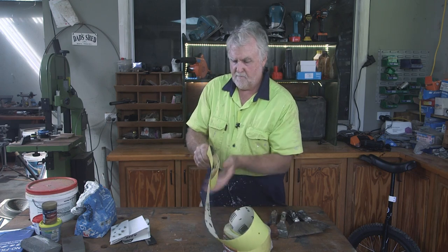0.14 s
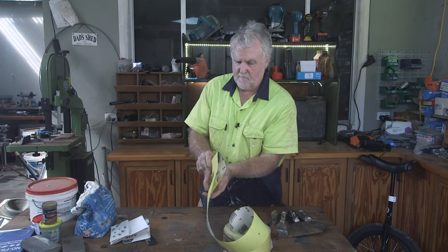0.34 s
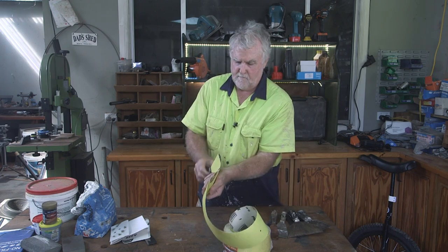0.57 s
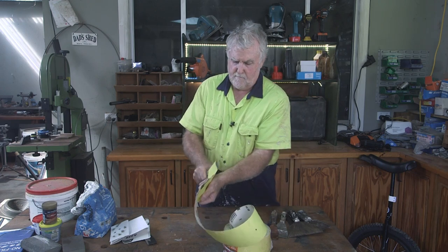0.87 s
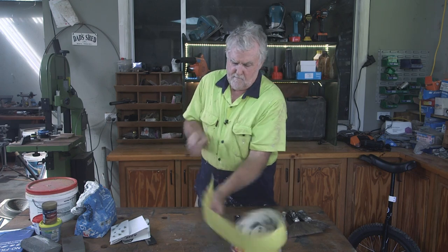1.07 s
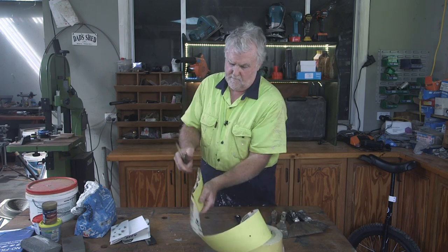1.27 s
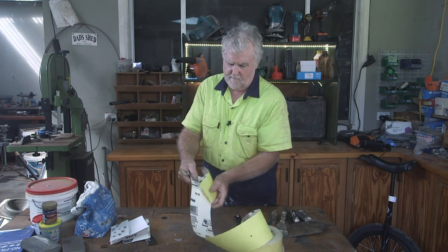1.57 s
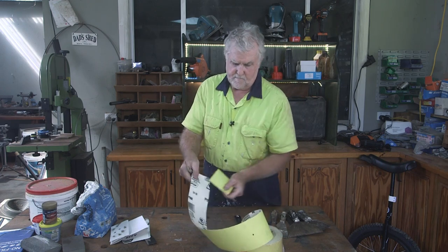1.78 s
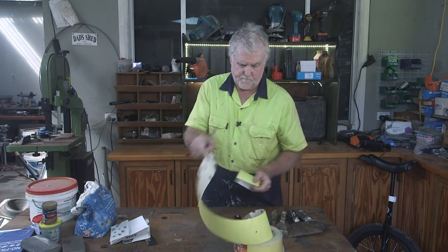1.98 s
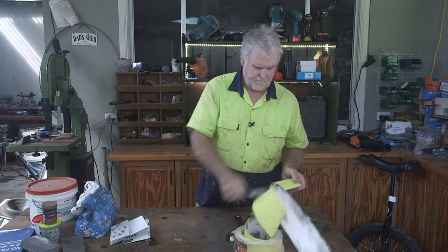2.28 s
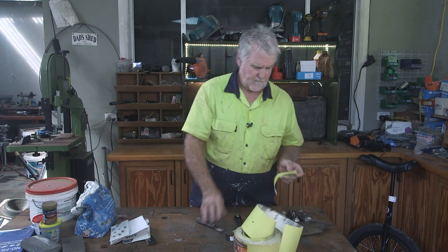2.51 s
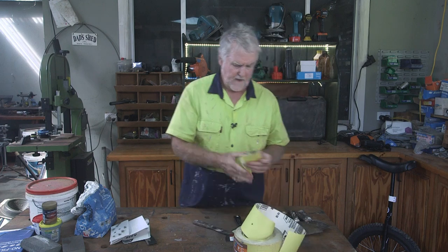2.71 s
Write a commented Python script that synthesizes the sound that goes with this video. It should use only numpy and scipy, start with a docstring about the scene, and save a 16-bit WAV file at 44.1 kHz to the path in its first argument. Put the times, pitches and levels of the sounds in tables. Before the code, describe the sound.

Sandpaper is handled close by in a small, quiet workshop: soft gritty rubs and light crackles for the first second, with a small hollow flop near 0.8. At about 1.0 a blade rips it in one short, sharp stroke, then crisp crackles and flops to 1.3. Quieter rustling follows, growing crinkly around 2.4. At 2.54-2.75 a putty knife clatters and rings on the wooden bench, with last paper scrapes.

```python
"""A small workshop with a wooden bench, heard from close by while sandpaper is handled.
Random grains make the gritty sheet rub and ring, and short bursts of snapping fibres make it crackle.
Bent hollow notes are its flops. A putty knife rips through the fold in one quick stroke of dense grains.
Dropped on the bench, the knife clatters: each chatter of contacts rings the blade and thuds the wood.
A short room tail and quiet noise lie around it all."""
import sys
import numpy as np
from scipy import signal
from scipy.fft import rfft, irfft
from scipy.io import wavfile

SR = 44100
rng = np.random.default_rng(int(sys.argv[2]) if len(sys.argv) > 2 else 0)


def dump_mix(stems):
    """Bounce the given channels to the path in sys.argv[1] as a 16-bit WAV at rate SR."""
    frames = np.atleast_2d(stems).T  # one column per channel
    limited = np.clip(frames, -1, 1)  # hard clip at full scale
    pcm = np.round(limited * 32767).astype(np.int16)
    wavfile.write(sys.argv[1], SR, pcm)


N = 125685
T = np.arange(N) / SR
HALF_SECOND = SR // 2  # samples; the length of every single event
GRAINS_PER_S = 9000  # grit of the sandpaper
FIBRES_PER_S, FIBRE_SPREAD_DB = 15000, 1.5  # snapping fibres of the backing

# Spectrum of the snapping backing, for cracks and the cut edge. Each row: frequency in Hz, level in dB.
CRACK_SPECTRUM = [(60, -37), (400, -9.5), (850, -2.5), (1400, 2), (2500, -4), (5000, 2.5), (9000, -3.5),
                  (16000, -3)]


def from_db(db):
    """Decibels to gain."""
    return 10 ** (np.asarray(db) / 20)


def unit(x):
    """Scale to rms 1."""
    return x / np.sqrt(np.mean(x ** 2) + 1e-20)


def add(track, s, x):
    """Mix a sound into a track at a time in seconds."""
    i = int(s * SR)
    track[i:i + len(x)] += x[:max(N - i, 0)]


def colour(x, spectrum, treble_db=0, bass_db=0, size=4096):
    """Minimum-phase filter with a given spectrum and two shelves; white noise keeps its power."""
    hz = np.maximum(np.arange(size // 2 + 1) * SR / size, 1)
    points, db = np.transpose(spectrum)
    treble_hz, bass_hz = 4630, 860  # half of each shelf's dB is reached here
    treble = treble_db / (1 + (treble_hz / hz) ** 3)
    bass = bass_db / (1 + (hz / bass_hz) ** 3)
    level_db = np.interp(np.log(hz), np.log(points), db) + treble + bass
    # folding the cepstrum forward in time makes the filter causal
    cepstrum = irfft(np.log(unit(from_db(level_db))))
    cepstrum[1:size // 2] *= 2
    cepstrum[size // 2 + 1:] = 0
    response = irfft(np.exp(rfft(cepstrum)))
    return signal.fftconvolve(x, response)[:len(x)]


def envelope(attack, hold, t60, swell_db=0):
    """Straight rise, a swell or fade until the hold ends, exponential release; times in seconds."""
    t = T[:HALF_SECOND]
    swell = swell_db * (np.minimum(t / hold, 1) - .5)
    release = 60 * np.maximum(t - hold, 0) / t60
    return np.minimum(t / attack, 1) * from_db(swell - release)


def grains(per_s, spread_db):
    """Half a second of tiny random snaps of uneven size; rms 1."""
    n = HALF_SECOND
    sizes = from_db(spread_db * np.minimum(rng.exponential(1, n), 5))
    signs = rng.choice([-1, 1], n)
    return unit(sizes * signs * (rng.random(n) < per_s / SR))


def ring(x, hz, t60):
    """One mode: a unit click sets a sine of height 1 ringing."""
    radius = np.exp(-np.log(1000) / (t60 * SR))
    w = 2 * np.pi * hz / SR
    return signal.lfilter([0, np.sin(w)], [1, -2 * radius * np.cos(w), radius ** 2], x + 1e-18)


def struck(x, modes):
    """A blow rings each mode (Hz, dB, t60 in s) to its own height; starts at about rms 1."""
    out = 0
    for hz, db, t60 in modes:
        tone = ring(x, hz, t60)
        out = out + from_db(db) * tone / np.abs(tone).max()
    return out / np.sqrt(sum(from_db(db) ** 2 for _, db, _ in modes) / 2)


def room_noise():
    """The quiet noise of the workshop: steady coloured noise."""
    # Spectrum of the noise. Each row: frequency in Hz, level in dB.
    noise_spectrum = [(15, -36), (25, -3.5), (463, -5.5), (962, -10), (1560, -9), (2110, -13),
                      (4740, -15.5), (7510, -21), (14800, -22), (16000, -18)]
    return from_db(-63.5) * colour(rng.standard_normal(N), noise_spectrum)


def room(x):
    """Reflections form a short diffuse tail, duller than the direct sound."""
    # Spectrum of the tail. Each row: frequency in Hz, level in dB.
    tail_spectrum = [(40, 0), (400, 0), (2000, -1.5), (6000, -5), (16000, -3.5)]
    t60_s, delay_s = 0.42, 0.0063
    t = T[:SR]
    decay = np.exp(-np.log(1000) * t / t60_s)
    onset = np.clip(t / delay_s - 1, 0, 1)  # silent for one delay, then rises over another
    tail = colour(rng.standard_normal(SR) * decay * onset, tail_spectrum)
    return signal.fftconvolve(x, tail / np.sqrt(np.sum(tail ** 2)))[:N]


def blade_ring(chatter, length):
    """Steel contacts ring the blade's clear modes, over a jangle of many too close to tell apart."""
    # Blade modes. Each row: frequency in Hz, level in dB before it varies from landing to landing.
    blade_modes = [(2194, -14), (2381, -18), (2520, -8), (2645, -5), (3006, -13), (3452, -6), (3570, 5.5),
                   (3667, 2.5), (3811, 0.5), (4523, -1.5), (5233, -1), (5397, -18), (5770, -4), (6795, -6),
                   (7240, -26), (7562, -4.5), (7783, -18), (10043, -27), (11361, -28), (11940, -11)]
    # Spectrum of the jangle. Each row: frequency in Hz, level in dB.
    jangle_spectrum = [(600, -21), (1800, 5.5), (3500, 2), (7500, 2.5), (8800, 0), (11500, -4.5),
                       (13500, -0.5), (16000, -20)]
    t60_s, varies_db = 0.11, 4
    modes = [(hz, db + varies_db * rng.standard_normal(), t60_s) for hz, db in blade_modes]
    jangle = rng.standard_normal(HALF_SECOND) * envelope(length, length, t60=.15)
    return struck(chatter, modes) + from_db(-6) * colour(jangle, jangle_spectrum)


def bench_thud(chatter, attack_s, length):
    """The blow gives a low burst of noise in the bench and rings one wooden mode."""
    # Spectrum of the thud. Each row: frequency in Hz, level in dB.
    thud_spectrum = [(25, -2.5), (55, -10.5), (90, 6.5), (125, -7.5), (190, 3.5), (270, -6.5), (380, 4.5),
                     (520, 3), (900, -5), (1500, -10), (4000, -39)]
    bench_hz, bench_t60_s = 382.3, 0.26
    noise = rng.standard_normal(HALF_SECOND) * envelope(attack_s, length, t60=0.067)
    bench_mode = struck(chatter, [(bench_hz, 0, bench_t60_s)])
    return colour(noise, thud_spectrum) + from_db(-10.5) * bench_mode


def knife():
    """Each landing is a short chatter of steel on wood: a clack, the ringing blade and a bench thud."""
    # Landings and bounces. Each row: start in seconds, chatter length in seconds, clack level in dB,
    # clack treble in dB, blade ring level in dB, bench thud level in dB.
    landings = [(2.5374, 0.0034, -22, -7, -24, -32), (2.5642, 0.005, -18, -39, -27, -32),
                (2.578, 0.0079, -23, -15, -22.5, -39.5), (2.5849, 0.0066, -16.5, -6.5, -20.5, -36.5),
                (2.607, 0.011, -29, 16, -25.5, -37.5), (2.6564, 0.0077, -26.5, 0, -26, -46),
                (2.677, 0.0066, -24, -4, -25.5, -36.5), (2.735, 0.002, -35, -14, -66, -36.5)]
    # Spectrum of the clack. Each row: frequency in Hz, level in dB.
    clack_spectrum = [(100, -11), (500, -10.5), (1000, -6), (1900, 0), (2700, -3), (4000, 6.5), (8500, 3.5),
                      (12000, 5), (16000, 3)]
    attack_s, t60_s = 0.00027, 0.022
    contacts_per_s, spread_db = 5300, 1.5
    out = np.zeros(N)
    for s, length, clack_db, treble_db, ring_db, thud_db in landings:
        chatter = grains(contacts_per_s, spread_db) * envelope(attack_s, length, t60_s)
        add(out, s, from_db(clack_db) * colour(chatter, clack_spectrum, treble_db))
        add(out, s, from_db(ring_db) * blade_ring(chatter, length))
        add(out, s, from_db(thud_db) * bench_thud(chatter, attack_s, length))
    return out


def flops():
    """The loose sheet buckles with a short hollow note that bends upward; the bench booms under it."""
    # Flops. Each row: start in seconds, relative level in dB, nominal pitch in Hz, t60 in seconds,
    # share by which the pitch starts low (0-1).
    buckles = [(0.8187, -22.5, 1300, 0.0056, 0.6), (1.096, -29.5, 242, 0.039, 0.04),
               (1.186, -32.5, 643, 0.094, 0.09), (1.215, -26.5, 473, 0.059, 0.39),
               (1.319, -41, 575, 0.15, 0.15), (2.232, -38, 404, 0.041, 0.1),
               (2.2325, -39, 1680, 0.066, 0.61)]
    # Modes of the note. Each row: ratio to the pitch, level in dB before the damping.
    note_modes = [(0.551, -10.5), (1, -1), (1.42, -6)]
    # Bench booms. Each row: start in seconds, level in dB.
    booms = [(1.098, -38), (1.147, -46.5)]
    rise_s = 0.0049
    damping_hz = 1910  # the limp sheet damps modes above this
    boom_hz, boom_t60_s = 101.7, 0.34
    out, t = np.zeros(N), T[:HALF_SECOND]
    for s, db, pitch_hz, t60, rise in buckles:
        # running time slowly at first bends the pitch up
        bent_time = t - min(rise, 1) * rise_s * (1 - np.exp(-t / rise_s))
        note = 0
        for ratio, mode_db in note_modes:
            hz = pitch_hz * ratio
            loss_db = 20 * max(hz / damping_hz, 1) ** 2 - 19.5
            detuned_hz = hz * rng.uniform(0.95, 1.02)
            note = note + from_db(mode_db - loss_db) * np.sin(2 * np.pi * detuned_hz * bent_time)
        add(out, s, from_db(db) * note * envelope(0.0015, 0.00091, t60))
    for s, db in booms:
        boom = np.sin(2 * np.pi * boom_hz * t) * envelope(0.0023, .005, boom_t60_s)
        add(out, s, from_db(db) * boom)
    return out


def cracks():
    """A crease in the stiff backing gives way: fibres snap in a burst that dies within milliseconds."""
    # Cracks. Each row: start in seconds, level in dB, treble in dB, bass in dB.
    creases = [(0.0208, -46.5, -15, 15), (0.128, -51.5, -4, 2), (0.4, -49, -13, 25), (0.4368, -35, 9, 24),
               (.462, -43, 24, 4), (0.487, -40, 13, 5), (0.507, -46, -27, 3), (.557, -41, -15, 18),
               (.749, -54.5, -5, -9), (.872, -39.5, -4, 2), (1.186, -25, -18, 10), (1.201, -28, -14, 30),
               (1.5165, -42.5, -7, 12), (1.5335, -42, -10, -13), (1.5883, -36, 24, 3), (1.763, -40, -6, 11),
               (1.8903, -42, -21, -13), (1.899, -40.5, -19, -4), (1.9308, -45.5, -6, -44),
               (1.939, -50, -6, -16), (2.144, -41.5, -14, -11), (2.296, -36, -16, -13),
               (2.304, -38.5, -24, 11), (2.3933, -31, -16, -53), (2.423, -27.5, -15, 16.5),
               (2.439, -27, -19, -7), (2.524, -32.5, -16, 19), (2.736, -35, -12, 9), (2.761, -35, -3, -5),
               (2.800, -37.5, -14, -8)]
    out = np.zeros(N)
    shape = envelope(attack=0.00035, hold=0.0008, t60=.012)
    for s, db, treble_db, bass_db in creases:
        snaps = grains(FIBRES_PER_S, FIBRE_SPREAD_DB) * shape
        add(out, s, from_db(db) * colour(snaps, CRACK_SPECTRUM, treble_db, bass_db))
    return out


def sheet(x, hz):
    """The free part of the sheet resonates broadly, lower as more slides out; rms 1."""
    width_hz, sag_oct_per_s = 580, 4.8
    centre_hz = hz * 2 ** (-sag_oct_per_s * T[:len(x)])
    turn = np.exp(2j * np.pi * np.cumsum(centre_hz) / SR)
    # shift the moving centre to 0 Hz, low-pass there, and shift it back
    lowpass = signal.butter(2, width_hz / 2, fs=SR, output="sos")
    return unit(np.real(turn * signal.sosfilt(lowpass, x / turn)))


def rubs():
    """Grit catches and slips over sheet and hands: grains whose pressure wavers, ringing the sheet."""
    # Strokes. Each row: start in seconds, length in seconds, level in dB, swell over the stroke in dB,
    # treble in dB, bass in dB, starting sheet resonance in Hz, spread of grain sizes in dB.
    strokes = [(0.019, 0.011, -52.5, -5.5, -4, -4, 1560, 2), (.096, 0.072, -64, -18, -10, 12, 1320, 4.5),
               (0.261, 0.086, -51.5, -14, 3, 6, 1800, 0), (0.341, 0.054, -47, 2.5, -4, 6.5, 1500, 1.9),
               (0.426, 0.076, -49, 5.5, 3.5, -2.5, 1490, 3.5), (0.552, 0.024, -48, -2.5, -2, 11, 1050, 4),
               (0.591, 0.068, -56.5, -4, 4, 10, 1250, 3), (0.661, 0.041, -52, 6.5, 0.5, -13, 2540, 1.5),
               (0.767, 0.064, -50, 5, 1.5, -2.5, 2740, 5), (0.961, 0.075, -51.5, 20, -4.5, -5, 2540, 1),
               (1.049, 0.11, -42, 5, 11, 11.5, 2360, 4.5), (1.165, 0.059, -39, 6, 9.5, 12, 3400, 1.5),
               (1.238, 0.087, -52.5, -2, 9, -5, 1175, 0.5), (1.316, .022, -42.5, -2, 9.5, 1, 605, 0.5),
               (1.347, 0.09, -58, -1.5, 3, -2, 1530, 3.5), (1.44, .10, -54, 6, 0.5, 4.5, 1690, 4),
               (1.553, 0.059, -46.5, -10, 8.5, 0.5, 2700, 3.5), (1.634, 0.15, -47.5, 10, -5, -12, 2520, 3),
               (1.83, 0.033, -53.5, 3, 1.5, -6, 1830, 2.5), (1.99, 0.052, -62.5, -8, 9, 8, 1300, 6.5),
               (2.082, 0.14, -57.5, -1, 9, 7, 560, 2), (2.264, 0.07, -53.5, -4, 6, 6, 1500, 1.5),
               (2.38, 0.071, -45, -4, 0.5, -4.5, 3800, 0.5), (2.426, 0.036, -39, -5.5, 4.5, 9.5, 1100, 3.5),
               (2.465, 0.057, -44.5, -3.5, 6, 3, 1370, 3), (2.731, .04, -46.5, 1, 5, 1, 1590, 2),
               (2.808, 0.017, -47.5, -12, -5, 1, 1330, 2.5), (2.839, 0.025, -39, 1, -2, 0, 2000, 4.5)]
    # Spectrum of the grit. Each row: frequency in Hz, level in dB.
    grit_spectrum = [(40, -12.5), (150, -9), (450, 1.5), (850, -2), (1500, 3.5), (2400, -0.5), (4000, -4),
                     (7000, -12), (12000, -14), (16000, -16.5)]
    attack_share, t60_s = 0.07, 0.11
    slip_db, slips_per_s = 3, 67.1
    sheet_db, loss_per_spread_db = -1.5, 5.5  # coarse, catching strokes ring the sheet less
    out = np.zeros(N)
    for s, length, db, swell_db, treble_db, bass_db, hz, spread_db in strokes:
        slip_points = rng.standard_normal(HALF_SECOND)
        # two random points to a slip
        slips = np.interp(T[:HALF_SECOND] * slips_per_s * 2, np.arange(HALF_SECOND), slip_points)
        grit = unit(grains(GRAINS_PER_S, spread_db) * from_db(slip_db * slips))
        shape = envelope(attack_share * length, length, t60_s, swell_db)
        scrape = colour(grit * shape, grit_spectrum, treble_db, bass_db)
        # bright strokes ring the sheet less too
        ring_gain = from_db(sheet_db - loss_per_spread_db * spread_db - treble_db / 2)
        add(out, s, from_db(db) * (scrape + ring_gain * sheet(grit, hz) * shape))
    return out


def rip():
    """The blade runs through the fold: fibres snap in a dense run and the freed edge hisses briefly."""
    # Spectrum of the tear. Each row: frequency in Hz, level in dB.
    tear_spectrum = [(25, -5), (60, -25), (110, -8.5), (250, -11), (650, -2), (1200, -3), (2300, 1.5),
                     (3200, -7.5), (4600, -1), (7000, -5), (9000, -10.5), (16000, -19)]
    start_s, attack_s, hold_s = 1.019, 0.0023, .012
    end_s = attack_s + hold_s  # after the start
    tear = grains(FIBRES_PER_S, FIBRE_SPREAD_DB) * envelope(attack_s, end_s, t60=0.042)
    edge = grains(GRAINS_PER_S, spread_db=6) * envelope(hold_s, end_s, t60=0.14)
    out = np.zeros(N)
    add(out, start_s, from_db(-17.5) * colour(tear, tear_spectrum))
    add(out, start_s, from_db(-29.5) * colour(edge, CRACK_SPECTRUM, treble_db=-14))
    return out


def scene():
    """The paper is close, the knife lands farther off with more room; quiet noise lies under both."""
    noise = room_noise()
    steel = knife()
    paper = flops() + cracks() + rubs() + rip()
    reflections = room(from_db(-16) * paper + from_db(-11.5) * steel)
    return (paper + steel + reflections + noise)[None]


def record(dry):
    """At the microphone, peaks are rounded and the top is cut steeply."""
    ceiling, cutoff_hz = .42, 15650
    rounded = ceiling * np.tanh(dry / ceiling)
    lowpass = signal.ellip(10, .1, 80, cutoff_hz, fs=SR, output="sos")
    return signal.sosfilt(lowpass, rounded)


dry = scene()
out = record(dry)
dump_mix(out)
```